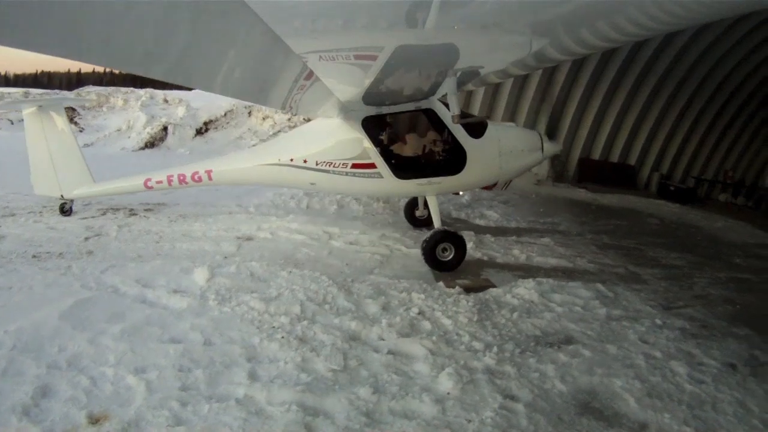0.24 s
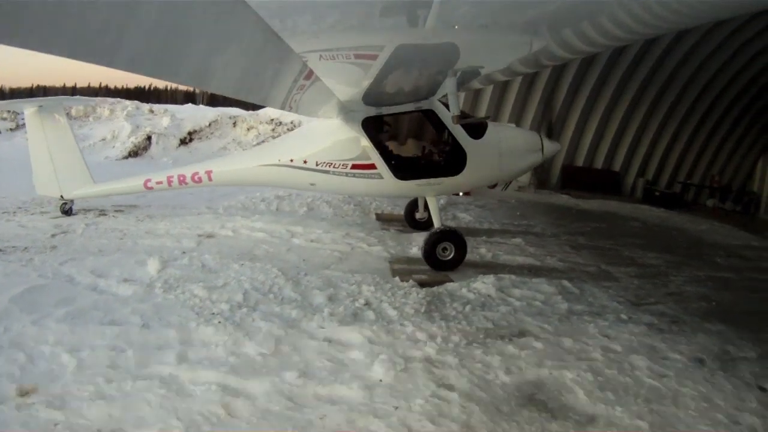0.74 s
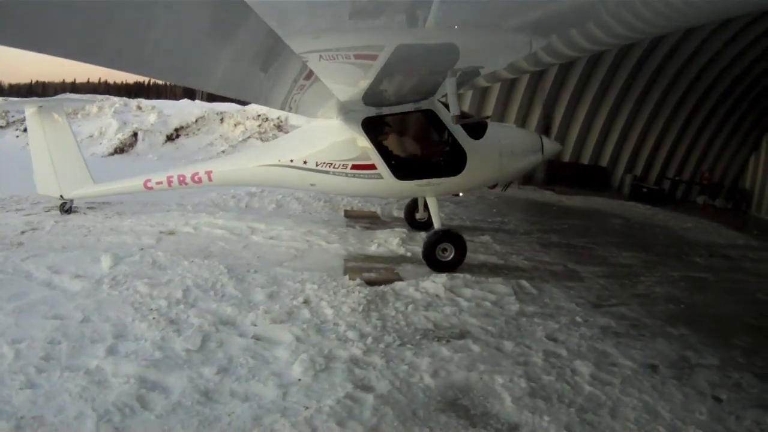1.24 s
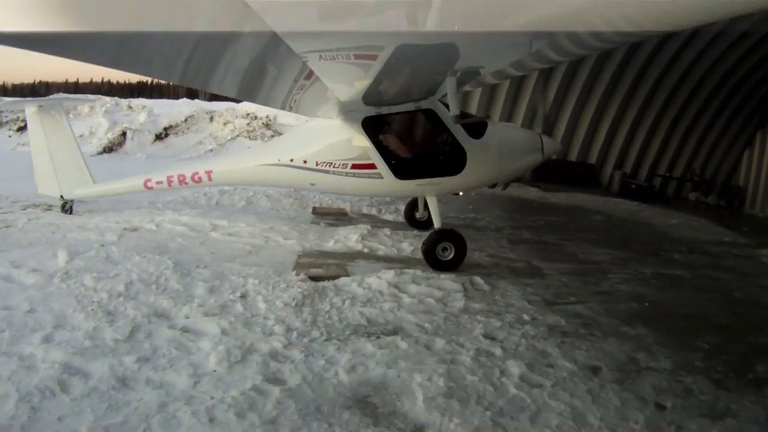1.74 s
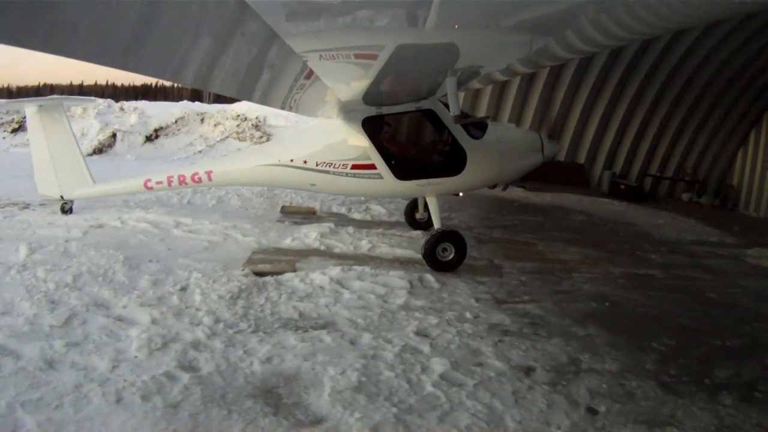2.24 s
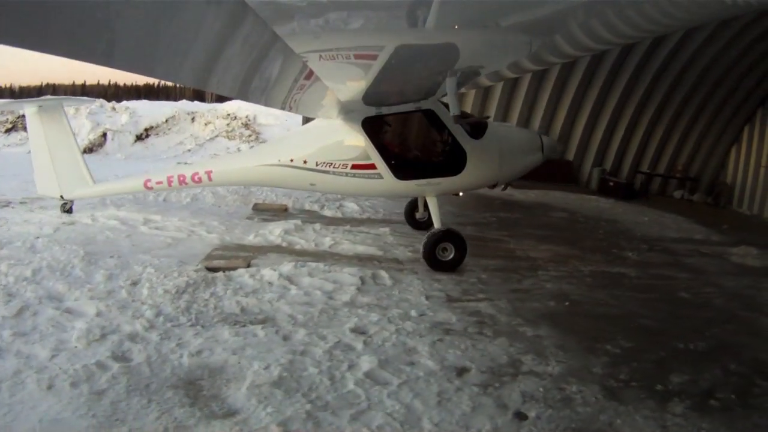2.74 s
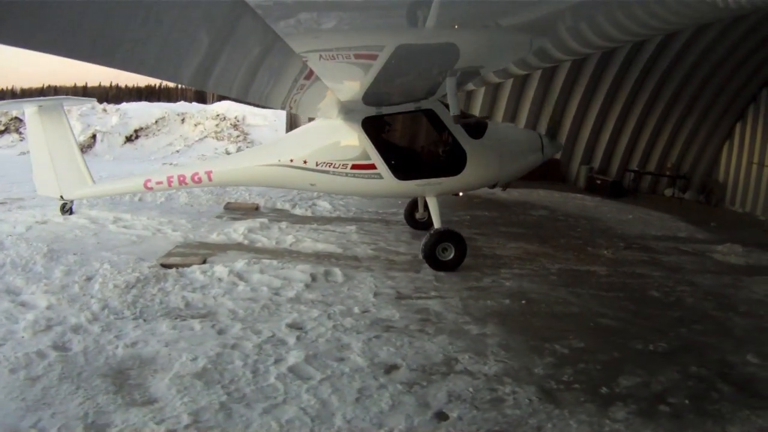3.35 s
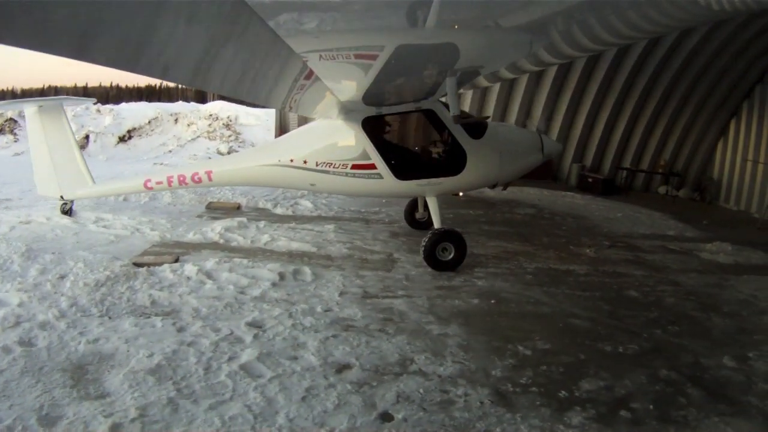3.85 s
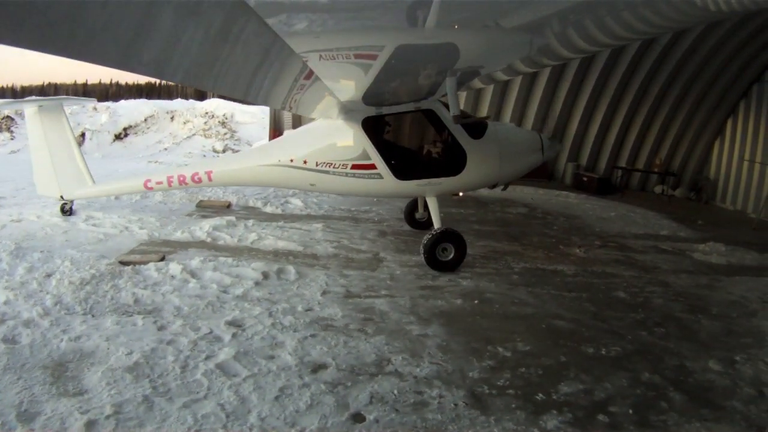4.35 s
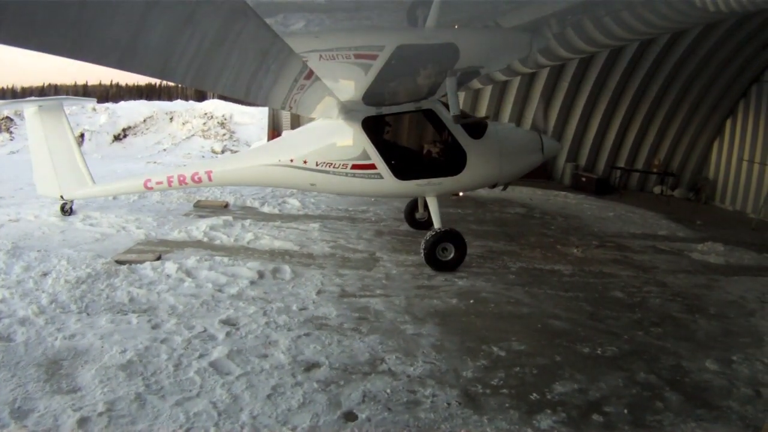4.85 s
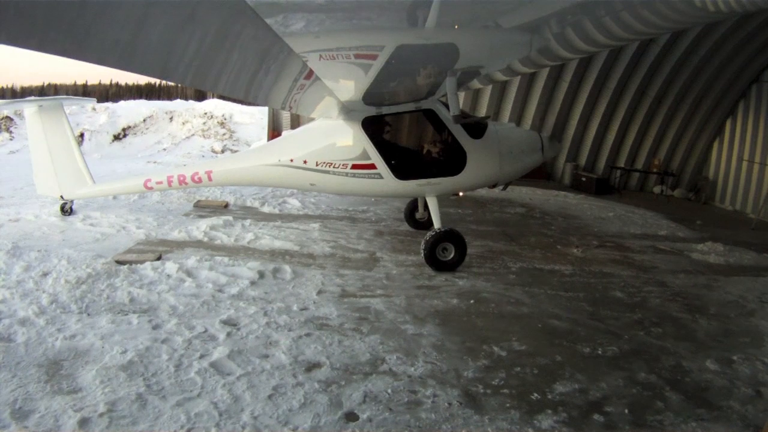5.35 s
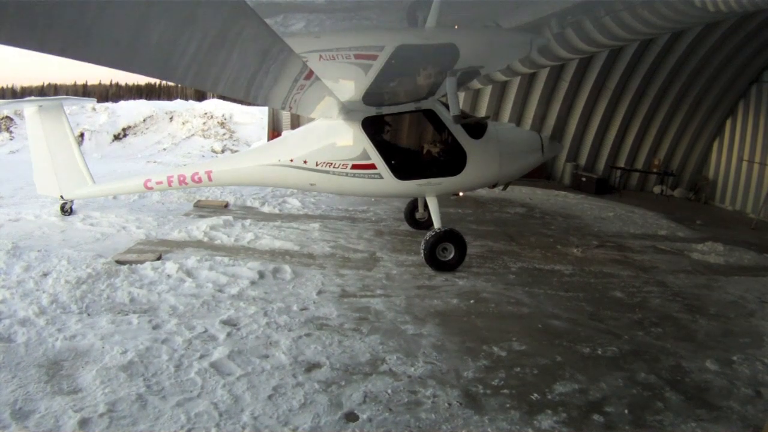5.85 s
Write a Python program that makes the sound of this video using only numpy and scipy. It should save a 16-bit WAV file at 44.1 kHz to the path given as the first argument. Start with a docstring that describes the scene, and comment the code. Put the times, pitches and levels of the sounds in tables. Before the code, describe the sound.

Under a small plane's wing, fast engine clatter and icy tyre crunch give way to a low, hollow idling hum with a few last ticks.

```python
"""A light aircraft taxis over packed snow, heard under its wing: the engine hums and clatters at a fast
tick-over, the geared propeller chops the noise, the wing shakes, a panel buzzes and frozen grains crunch.
Bumps tick the mount throughout the taxi. Near two seconds the engine drops to idle, crunch and buzz fade,
and the hum booms in the airframe; a few last ticks follow. Sines make hum and shake, filtered noise bursts
the clatter and buzz, random grains the tyres, ringing clicks the mount. Held samples add a glassy treble."""
import sys
import numpy as np
from scipy import signal
from scipy.fft import rfft, irfft, next_fast_len
from scipy.io import wavfile

SR = 44100
rng = np.random.default_rng(int(sys.argv[2]) if len(sys.argv) > 2 else 0)


def persist_wave(psi):
    """Save psi, clipped to +-1, as 16-bit WAV."""
    counts = np.round(np.clip(psi, -1, 1) * 32767).astype(np.int16)
    wavfile.write(sys.argv[1], SR, np.atleast_2d(counts).T)


N = 269451
TIME = np.arange(N) / SR

BRAKE_S = 1.85   # the aircraft begins to slow
REBOUND_DB = -38.5   # click level of a first rebound


def from_db(db):
    """Decibels to gain."""
    return 10 ** (np.asarray(db) / 20)


def rms_one(x):
    """Scale to unit power."""
    return x / np.sqrt(np.mean(x ** 2) + 1e-20)


def in_time(rows):
    """Each column of a curve at every sample."""
    s, *columns = np.transpose(rows)
    return [np.interp(TIME, s, column) for column in columns]


def drift(rate_hz):
    """Slow random wandering with spread 1: noise through two equal poles, at a fortieth of the rate."""
    pole = np.exp(-2 * np.pi * rate_hz * 40 / SR)
    noise = rng.standard_normal(N // 40 + 2002)
    slow = signal.lfilter([1], [1, -2 * pole, pole * pole], noise)[2000:]   # drop the settling
    return np.interp(np.arange(N) / 40, np.arange(len(slow)), rms_one(slow))


def coloured(x, spectrum):
    """Give a steady noise a spectrum, drawn over log frequency; unit power."""
    hz, db = np.transpose(spectrum)
    size = next_fast_len(N)
    bins_hz = np.maximum(np.arange(size // 2 + 1) * SR / size, 1)
    gain = from_db(np.interp(np.log(bins_hz), np.log(hz), db))
    return rms_one(irfft(rfft(x, size) * gain, size)[:N])


def resonate(x, hz, width_hz):
    """Two like resonances in a row, with the given overall width; unit power."""
    r = np.exp(-np.pi * width_hz / np.sqrt(np.sqrt(2) - 1) / SR)
    section = [1 - r, 0, r - 1, 1, -2 * r * np.cos(2 * np.pi * hz / SR), r * r]
    return rms_one(signal.sosfilt([section, section], x))


def ring(clicks, hz, t60_s):
    """A unit click starts a decaying sine of initial height 1."""
    r, w = from_db(-60 / (t60_s * SR)), 2 * np.pi * hz / SR
    return signal.lfilter([0, np.sin(w)], [1, -2 * r * np.cos(w), r * r], clicks + 1e-18)


def pulsing(turns, depth_db):
    """A gain that swells once a cycle, by depth_db either way."""
    return from_db(depth_db * np.cos(2 * np.pi * turns))


def between(throttle, taxi_db, idle_db):
    """A gain that slides in dB from its idle to its taxi level."""
    return from_db(idle_db + throttle * (taxi_db - idle_db))


def braking_s():
    """Time since the aircraft began to slow."""
    return np.maximum(TIME - BRAKE_S, 0)


def knocks(turns, spread_db, length_s, rise_s=0.0016):
    """Valves and gear teeth knock four times a turn, each a soft noise burst of its own strength."""
    count = np.floor(4 * turns).astype(int)
    strength = from_db(spread_db * rng.standard_normal(2000))[count]
    starts = np.diff(count, prepend=0) * strength
    poles = np.exp(-1 / (np.array([length_s, rise_s]) * SR))
    bursts = signal.lfilter([1], np.poly(poles), starts)
    return rms_one(bursts * rng.standard_normal(N))


def tyres(grains_per_s=2500, spread_db=2.5):
    """Clumped grains of frozen snow crunch under the wheels and fade under braking."""
    level_db, fade_db_per_s = -48, 45
    born = rng.random(N) < grains_per_s * from_db(3 * drift(25)) / SR
    strength = from_db(spread_db * np.minimum(rng.exponential(1, N), 4))
    grains = born * strength * rng.choice([-1, 1], N)
    # crunch spectrum: f/Hz, density/dB per Hz
    colour = [(200, -9.5), (1200, 7.5), (2300, 0.5), (5500, -1.5), (7000, -33)]
    return from_db(level_db - fade_db_per_s * braking_s()) * coloured(grains, colour)


def panel_buzz(turns, flutter_db=2.0):
    """The knocks shake a loose panel in fits, more and more until the aircraft slows."""
    peak_db, rise_db_per_s, fade_db_per_s = -50, 3, 32   # before the flutter
    before_s = np.maximum(BRAKE_S - TIME, 0)
    level_db = peak_db - rise_db_per_s * before_s - fade_db_per_s * braking_s()
    level_db = level_db + flutter_db * drift(7.3)
    return from_db(level_db) * resonate(knocks(turns, spread_db=0.0, length_s=0.013), 416, 34.5)


def ticks():
    """Bumps click and may rebound ever more faintly; bumps before braking scatter crackle round them."""
    # bumps that knock the mount: t/s, click level/dB, rebounds (rounded; none below 1)
    bumps = [(.2603, -43, -1), (.3431, -23, 4.5), (.4125, -33, 1), (.5487, -31, 1), (1.1722, -44, 0.5),
             (1.3733, -39, 1), (1.5184, -38, -0.5), (1.5324, -25.5, 2), (2.367, -39, 0.5), (2.8779, -39, 0)]
    rebound_s, loss_db = .019, 1.5   # spacing, and loss on each further rebound
    crackle_s, crackle_db = .05, -57   # reach to either side, and click level
    hits = [(s, db) for s, db, _ in bumps]
    rebounds = [(s + (k + 1) * rebound_s, REBOUND_DB - k * loss_db)
                for s, _, count in bumps for k in range(round(count))]
    crackle = [(s + u * crackle_s, crackle_db)
               for s, _ in hits if s < BRAKE_S for u in rng.uniform(-0.89, 1, size=4)]
    return crackle + rebounds + hits


def mount_ticks(lag_s=0.000874, scuff_s=0.0032, scuff_db=-53, growth=0.48):
    """A click and a noisy scuff ring the mount's modes; the scuff grows more slowly than the click."""
    # modes of the mount: f/Hz, relative level/dB, t60/s
    mount_modes = [(2110, -1.5, 0.019), (2490, -0.5, 0.013), (3530, 4, 0.0039), (4560, 3, 0.0034),
                   (5380, -1, 0.0049)]
    clicks, scuffs = np.zeros((2, N))
    for s, db in ticks():
        at = int((s + lag_s) * SR)
        clicks[at] = from_db(db)
        scuffs[at] = from_db(scuff_db + growth * (db - REBOUND_DB))
    scuff_decay = signal.lfilter([1], [1, -np.exp(-1 / (scuff_s * SR))], scuffs)
    contact = clicks + scuff_decay * rng.standard_normal(N)
    return sum((-1) ** k * from_db(db) * ring(contact, hz, t60_s)
               for k, (hz, db, t60_s) in enumerate(mount_modes))


def wing_shake(turns, throttle):
    """The wing swings at its own mode and follows the crank; the two beat about five or six times a second."""
    # swing on the uneven snow, dying down at the end: t/s, level/dB
    swing_level = [(0, -28.5), (0.45, -23), (0.95, -43), (1.5, -22.5), (1.8, -35.5), (1.95, -34),
                   (2.15, -21), (2.6, -27.1), (3.0, -23.5), (3.15, -36.5), (6.11, -41.5)]
    wing_hz = 32.8
    swing = from_db(in_time(swing_level)[0]) * np.cos(2 * np.pi * wing_hz * TIME)
    unbalance = between(throttle, -31, -39) * np.cos(2 * np.pi * turns)   # the crank's, felt in the wing
    tremor = from_db(-40) * resonate(rng.standard_normal(N), wing_hz, width_hz=6)
    return np.sqrt(2) * (swing + unbalance) + tremor   # root two makes the levels RMS


def clatter(turns, throttle, chop):
    """Knocks ring the airframe over a broad rush; a bright rattle swells once a crank turn."""
    # resonances of airframe and cowling: f/Hz, width/Hz, relative level in taxi/dB, at idle/dB
    body_modes = [(46.3, 7, 1, 0), (114, 10, -8.5, -7), (206, 48, -12, -11), (359.5, 74, -17.5, -14.5),
                  (406.5, 53, -23.5, -18), (482, 75, -18.5, -14), (755.5, 44, -19.5, -16),
                  (868.3, 41, -11, -8.5), (1224, 173, -15.5, -6), (1366, 41, -19.5, -14.5),
                  (1837, 200, -0.5, 2), (2245, 205, -10, -6.5), (2572, 270, -12.5, -10),
                  (3042, 61, -21, -16.5)]
    # broad bed under them: f/Hz, density in taxi/dB per Hz, at idle/dB per Hz
    bed = np.array([(25, 44, 0), (60, -18, 4), (140, -5, 0.5), (300, -5, -9.5), (580, 6, -3), (674, 16, -3),
                    (815, -3, 2), (970, 5, -1.5), (1610, 0, -8), (2060, -5.5, -4.5), (3300, -5, -5.5),
                    (4230, 13, -10), (4140, -20, -18), (4830, -12, -9.5), (6240, 0, -17)])
    drive = knocks(turns, spread_db=1.5, length_s=0.0076) * chop
    body = 0
    for hz, width_hz, taxi_db, idle_db in body_modes:
        signs = rng.choice([-1, 1], N)   # makes the modes independent
        body = body + between(throttle, taxi_db, idle_db) * resonate(drive * signs, hz, width_hz)
    rush = knocks(turns, spread_db=2.5, length_s=0.011) * chop
    taxi_rush = np.sqrt(throttle) * from_db(-2.5) * coloured(rush, bed[:, [0, 1]])
    idle_rush = np.sqrt(1 - throttle) * from_db(-5.0) * coloured(rush, bed[:, [0, 2]])
    rattle_drive = knocks(turns, spread_db=4.0, length_s=0.019) * pulsing(turns, depth_db=3.0)
    rattle = between(throttle, -13.7, -8.5) * resonate(rattle_drive, 3616, 222)
    return body + taxi_rush + idle_rush + rattle


def order(turns, multiple, rough):
    """One engine order of about unit power; uneven firing makes it waver."""
    phase = 2 * np.pi * (multiple * turns + rng.random())
    in_phase = (1 + rough * drift(3.7)) * np.sin(phase)
    return np.sqrt(2) * (in_phase + rough * drift(10.5) * np.cos(phase))


def engine_hum(turns, speed, throttle):
    """Orders follow the throttle; at low speed one after another slides through the airframe's boom."""
    # engine orders: multiple of the crank rate, level in taxi/dB, level at idle/dB
    order_levels = [(.5, -67, -65), (2, -46, -46), (3, -61, -56), (4, -52.5, -78), (5, -57.5, -68),
                    (6, -61, -64.5), (7, -65.5, -60.5), (7.5, -68, -60), (8, -57, -59.5), (9, -60.5, -58),
                    (9.5, -70, -76), (10, -62, -70), (10.5, -58, -88), (11, -58.5, -71), (12, -64, -68),
                    (13, -61, -62.5), (15, -63.5, -64), (20, -95, -65)]
    # sixth order's extra hum, before it fades with the throttle: t/s, level/dB
    sixth_level = [(0.0, -46.5), (0.13, -53.5), (0.34, -44), (0.93, -40.5), (0.98, -47.5), (1.79, -38.5),
                   (2.1, -47.5)]
    # boom, before it fades in as the throttle closes: t/s, level/dB
    boom_level = [(2.0, -47.5), (2.25, -37.5), (2.41, -64), (2.43, -41), (2.58, -38.5), (4.8, -34),
                  (5.5, -36.5), (5.56, -44), (6.11, -38)]
    boom_hz, boom_width_hz = 113.4, 3.3   # the airframe resonance that booms
    hum = sum(between(throttle, taxi_db, idle_db) * order(turns, k, rough=0.19)
              for k, taxi_db, idle_db in order_levels)
    sixth = np.sqrt(throttle) * from_db(in_time(sixth_level)[0]) * order(turns, 6, rough=0.049)
    passing = np.array([3, 3.5, 4])[:, None]   # orders near the boom
    weight = np.array([.4, .3, 1])[:, None]
    response = weight / (1 + (2 * (passing * speed - boom_hz) / boom_width_hz) ** 2)
    shares = response / np.linalg.norm(response, axis=0)   # constant total power
    boom = sum(share * order(turns, k, rough=0.06) for k, share in zip(passing, shares))
    return hum + sixth + np.sqrt(1 - throttle) * from_db(in_time(boom_level)[0]) * boom


def scene():
    """One crankshaft drives hum, clatter, buzz and propeller; wing, mount and tyres join in."""
    # crankshaft: t/s, turns per second/Hz
    crank_speed = [(0, 38.75), (0.4, 38.78), (0.55, 38.52), (0.8, 38.88), (1.3, 38.43), (1.6, 38.86),
                   (1.9, 38.23), (2.25, 28.65), (2.45, 27.02), (2.65, 27.52), (3.2, 27.93), (3.8, 27.64),
                   (4.05, 28.14), (4.7, 27.93), (5.3, 28.15), (5.65, 26.95), (6.11, 26.85)]
    # clatter of the machinery, before a 1.77 dB trim: t/s, level/dB
    clatter_level = [(0, -40.5), (1.9, -37.5), (2.2, -42), (3.3, -41), (4.9, -39.5), (5.7, -41.5),
                     (6.11, -41)]
    idle_hz, taxi_hz = 28, 38.6   # crank rates at throttle 0 and 1
    blades_per_turn = 2 / 2.43   # two blades, geared down
    speed, = in_time(crank_speed)
    clatter_db, = in_time(clatter_level)
    turns = np.cumsum(speed) / SR
    throttle = np.clip((speed - idle_hz) / (taxi_hz - idle_hz), 0, 1)
    # each blade's wash sweeps the wing
    chop = pulsing(blades_per_turn * turns, depth_db=0.22 + 1.0 * throttle)
    machinery = from_db(clatter_db - 1.77) * clatter(turns, throttle, chop)
    background = tyres() + panel_buzz(turns) + mount_ticks()
    mix = background + wing_shake(turns, throttle) + machinery + engine_hum(turns, speed, throttle)
    return mix[None]


def record(dry, band_hz=5780):
    """Low-rate samples held as steps mirror the band about multiples of 6 kHz into a glassy treble."""
    held_rate_hz, hold = 12000, 4   # each sample repeated four times
    sound = signal.sosfilt(signal.butter(2, 14, "high", fs=SR, output="sos"), dry)
    sound = signal.sosfilt(signal.cheby1(8, .3, band_hz, fs=SR, output="sos"), sound)
    steps = np.repeat(signal.resample_poly(sound, held_rate_hz, SR, axis=1), hold, axis=1)
    sound = signal.resample_poly(steps, SR, held_rate_hz * hold, axis=1)[:, :N]
    top_cut = signal.ellip(10, .2, 70, 15150, fs=SR, output="sos")
    return signal.sosfilt(top_cut, sound)


dry = scene()
out = record(dry)
persist_wave(out)
```